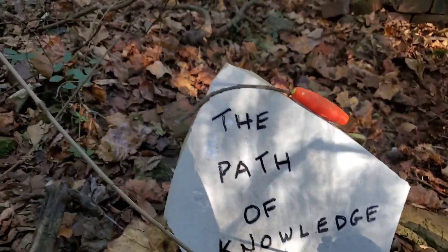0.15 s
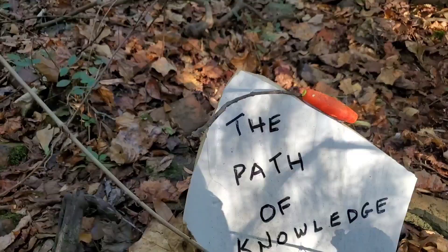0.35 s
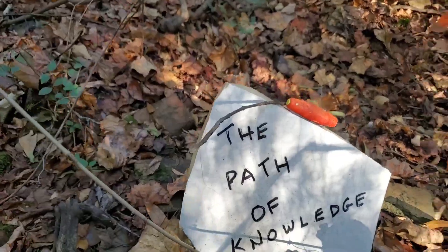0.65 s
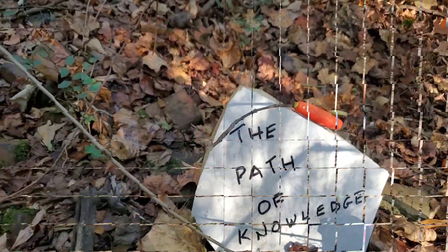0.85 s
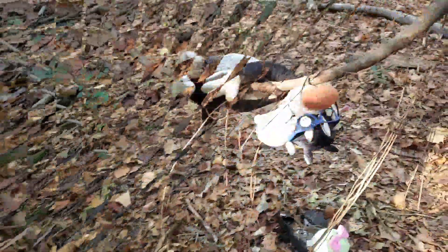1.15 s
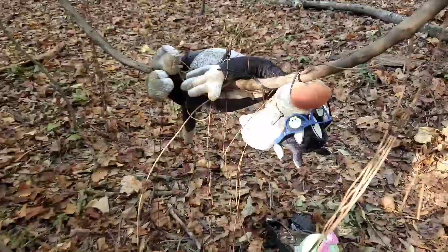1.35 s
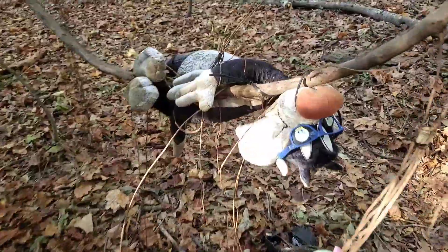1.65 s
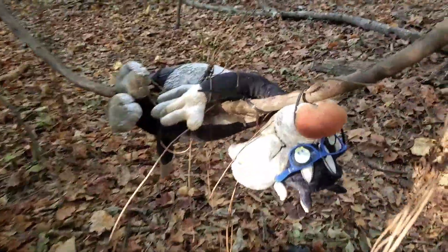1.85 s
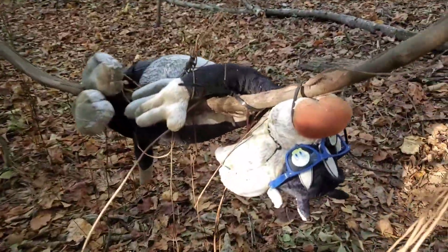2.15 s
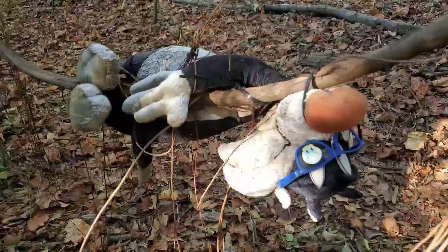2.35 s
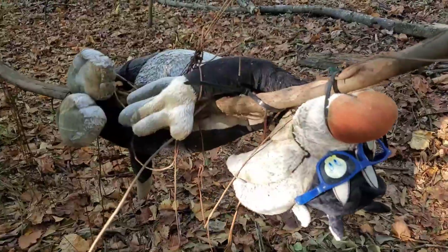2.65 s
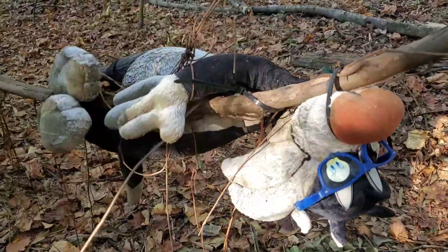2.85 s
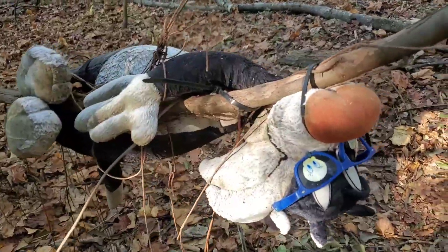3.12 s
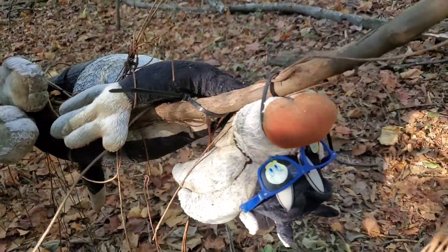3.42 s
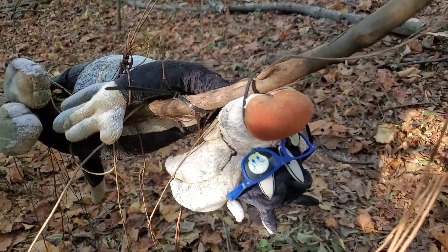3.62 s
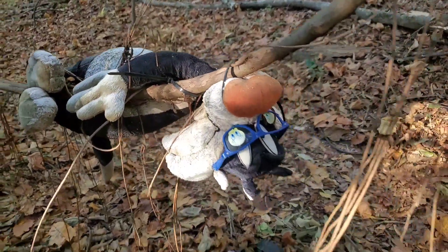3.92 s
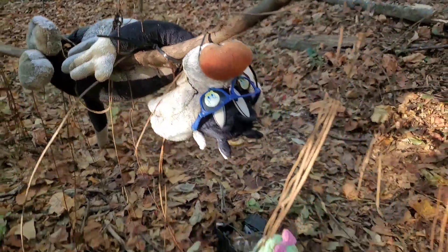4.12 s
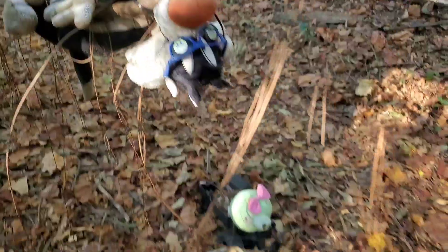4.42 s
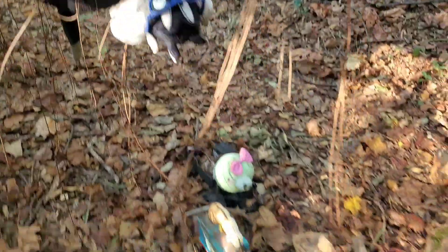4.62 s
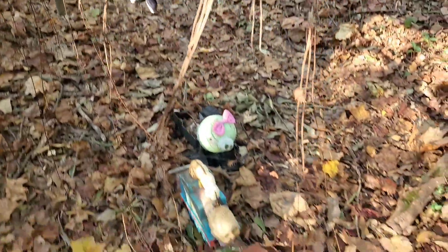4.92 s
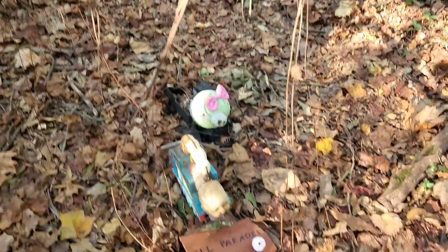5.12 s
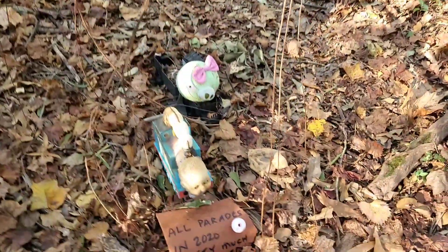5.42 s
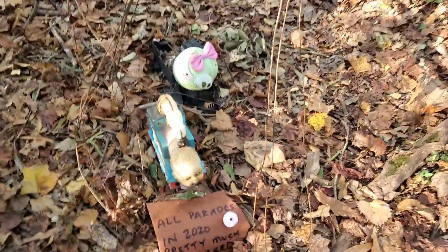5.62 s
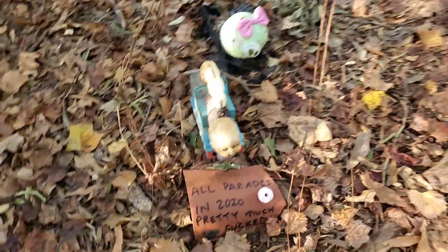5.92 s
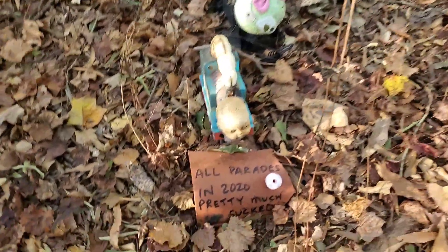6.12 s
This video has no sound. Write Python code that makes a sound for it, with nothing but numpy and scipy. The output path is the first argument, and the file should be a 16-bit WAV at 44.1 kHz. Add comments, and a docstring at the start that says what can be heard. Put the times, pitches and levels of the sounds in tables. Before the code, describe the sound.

A quiet forest trail, heard outdoors through a close handheld stereo microphone. From 0 to about 2.2 seconds, feet shuffle softly in dry leaves: a papery, irregular rustle with small brittle twig ticks, thickest around 1.3 to 2 seconds. It thins to almost nothing by 2.7. Between 3 and 3.8 seconds come several short, soft cloth swishes, like a sleeve sliding on a jacket. Thin, rapidly pulsed cricket chirps near 4 to 5 kilohertz recur until about 4.9, clearest around 2 and 3.5, above a faint distant insect shimmer. Slight leaf stirs and ticks return from 4 seconds. At about 5.15 a loud crunching step lands, then another, fuller one from 5.7 to the end near 6.3, with sharp crackles, snapping twigs and dull low thuds. Uneven low wind rumble and a steady woodland hush lie underneath.

```python
"""Footsteps on dry forest leaves

Someone shuffles on the dry leaves of a forest trail, pauses, then takes two crunching steps.
Leaves and twigs are random impulses exciting damped resonances; a sleeve swishes as modulated friction noise.
Cricket chirps are trains of gliding tones; the woods' hush is spectrally shaped noise, and so is a low rumble
of wind with the probable heel thuds of the two steps."""
import sys
import numpy as np
from scipy import signal
from scipy.fft import rfft, irfft, next_fast_len
from scipy.io import wavfile
from scipy.ndimage import uniform_filter1d

SR = 44100
rng = np.random.default_rng(int(sys.argv[2]) if len(sys.argv) > 2 else 0)


def dump_mix(stems):
    """Bounce the given channels to the path in sys.argv[1] as a 16-bit WAV at rate SR."""
    frames = np.atleast_2d(stems).T  # one column per channel
    limited = np.clip(frames, -1, 1)  # hard clip at full scale
    pcm = np.round(limited * 32767).astype(np.int16)
    wavfile.write(sys.argv[1], SR, pcm)


N = 276404
T = np.arange(N) / SR  # time in seconds

# Spectrum of breaking litter. Each row: frequency in Hz, relative density in dB per Hz.
LITTER_SPECTRUM = [(150, -10), (350, -4.5), (650, -0.5), (1050, -1), (1900, -4), (2800, 0.5), (4200, -2.5),
                   (5400, -2.5), (6600, -1.5), (8200, -8.5), (10000, -7.5), (11500, -4.5), (13200, -4),
                   (15500, -2.5)]
# Presses of a foot on the litter, light in a shuffle, full in a step. Each row: start in seconds,
# hold in seconds, relative crunch level in dB, crisp leaf edges relative to the crunch in dB,
# left minus right in dB.
FOOTFALLS = [ (0.0, .54, -54.5, -1.5, -1), (0.598, 0.36, -57, -4.5, -1), (1.14, 0.23, -57, -3.5, 1),
             (1.348, .28, -53.5, -4, 1), (1.725, 0.053, -50.5, -1.5, 0.5), (1.98, 0.08, -60, 2.5, -2),
             (2.145, .1, -63.5, 0, -1), (2.618, .03, -66, 8, -4), (3.927, .16, -63, -3, 0.5),
             (4.137, .11, -60, -2, -1), (4.594, .17, -66, -1, 1), (4.97, .1, -56, -3, 0),
             (5.159, .1, -39.5, -3, 1), (5.522, .12, -41, -5.5, 0), (5.744, .29, -36.5, -2.8, 1),
             (6.086, .03, -38, -2.5, 2), (6.184, .07, -43, -4, -0.5), ]
FOOT_ATTACK_S, FOOT_RELEASE_S = 0.075, 0.08  # the sole settles, the leaves spring back
FULL_STEP_DB = -37  # crunch under the whole weight
BREAKS_PER_S, BREAKS_POWER = 1700, 0.22  # nominal rate in a full step; a lighter foot breaks fewer
BODY_POWER = 0.14  # the harder the foot presses, the more the packed layer beneath is heard
STIR_DB = -69  # least crunch drive: the litter never lies quite still
RUB_DB = -5  # hiss of sliding leaves beside the crackle


def leaves(spread_db, flurry_db, stems_db, body_db, crisp_db, crunch_db):
    """Fracture and friction under load: weight breaks more leaves and brings out the low crunch."""
    weight, edges = np.full((2, N), undb(STIR_DB)), np.zeros((2, N))
    for start_s, hold_s, crunch_level_db, edge_db, pan_db in FOOTFALLS:
        envelope = press(start_s, hold_s, FOOT_ATTACK_S, FOOT_RELEASE_S)
        foot = envelope * undb(crunch_level_db) * place(pan_db)
        weight = np.maximum(weight, foot)
        edges = np.maximum(edges, foot * undb(edge_db))
    load = weight.mean(axis=0) / undb(FULL_STEP_DB)

    breaking = crackle(BREAKS_PER_S * load ** BREAKS_POWER, spread_db, flurry_db)
    breaking = breaking + undb(stems_db) * stems(rate=32, spread_db=-0.5)
    litter = colour(breaking + undb(RUB_DB) * air(N), LITTER_SPECTRUM)

    crisp = unit(band(litter, 6200, 24000, order=3))
    crunch = unit(band(litter, 150, 5200, order=3))
    # zero-phase low-pass, so the body can be re-weighted within the crunch
    body = signal.sosfiltfilt(signal.butter(2, 1700, fs=SR, output="sos"), crunch)
    crunch = crunch + body * (undb(body_db) * load ** BODY_POWER - 1)
    return undb(crisp_db) * crisp * edges + undb(crunch_db) * crunch * weight


# Decay of a leaf break, a single row: ring time constant in seconds, relative scatter level in dB,
# scatter time constant in seconds.
LEAF_FADE = (.0009, -14, .005)


def crackle(rate, spread_db, flurry_db, count=40):
    """Random impulse process: leaves break in flurries, more often in the higher resonances."""
    out = 0
    flurry = undb(flurry_db * walk(70))
    for centre_hz in np.geomspace(600, 15000, count):
        share = (centre_hz / 3500) ** 0.6
        chance = flurry * share * rate / count / SR
        hits = np.flatnonzero(rng.random(N) < chance)
        grade = np.minimum(rng.exponential(size=len(hits)), 3.3)
        sign = rng.choice([-1, 1], len(hits))
        breaks = np.zeros((1, N))
        # dividing by the root of the rate keeps the mean power steady; weight sets the level later
        breaks[0, hits] = undb(spread_db * grade) * sign / np.sqrt(rate[hits])
        leaf = crack(centre_hz, breadth=0.52, click_db=-0.5, fade=LEAF_FADE)
        # mean power proportional to centre frequency: even per Hz over this spacing
        leaf = unit(leaf) * np.sqrt(centre_hz / share)
        out = out + signal.oaconvolve(breaks, leaf, axes=1)[:, :N]
    return unit(out)


# Decay of a stem or twig break, a single row: ring time constant in seconds,
# relative scatter level in dB, scatter time constant in seconds.
TWIG_FADE = (.0015, -14, .007)


def stems(rate, spread_db, count=6):
    """Random fracture: leaf stems give way with a broader, longer-ringing crack than the leaves."""
    out = 0
    for centre_hz in np.geomspace(1500, 7000, count):
        hits = rng.random((1, N)) < rate / count / SR
        breaks = hits * undb(spread_db * rng.uniform(-1.1, 1, N))
        stem = crack(centre_hz, breadth=0.79, click_db=-9.5, fade=TWIG_FADE)
        out = out + signal.oaconvolve(breaks, unit(stem), axes=1)[:, :N]
    return unit(out)


# Twigs breaking. Each row: start in seconds, relative level in dB, lowest and highest frequency in Hz.
SNAPS = [ (0.8607, -36.5, 2240, 15000), (1.068, -36, 1860, 4670), (1.5737, -35, 2330, 16000),
         (1.6074, -32, 890, 12100), (1.6614, -40, 1460, 12000), (1.6991, -33, 1290, 15000),
         (1.709, -33.5, 2400, 16000), (1.905, -33, 780, 3960), (1.977, -40, 2180, 12000),
         (2.0537, -35, 1650, 13800), (2.405, -43, 2200, 16000), (2.5488, -46, 1800, 4500),
         (2.6082, -42, 1810, 15150), (4.003, -44, 550, 1510), (4.23, -46, 3000, 14000),
         (4.253, -43.5, 1800, 12100), (4.3595, -48, 1500, 11060), (4.714, -46, 1700, 4400),
         (4.8885, -38.5, 2470, 16200), (4.9787, -36, 1490, 6940), (5.0438, -39.5, 2000, 13800),
         (5.149, -21, 1592, 6000), (5.319, -31, 1397, 12300), (5.406, -36, 1780, 11000),
         (5.618, -30.5, 298.5, 2990), (5.724, -22, 1990, 15900), (5.8773, -22.5, 2210, 16150),
         (5.891, -25.5, 2000, 15800), (5.928, -25, 1500, 11180), (5.9895, -22.5, 590, 5500),
         (6.061, -25, 923, 9050), (6.0936, -25, 900, 12000), (6.1116, -28.5, 1500, 15000),
         (6.23, -27.5, 2236, 16100), (6.2524, -23.5, 795, 8300), ]


def twigs(gain_db):
    """Brittle fracture: each loud snap is a short impulse response confined to its own band."""
    out = np.zeros((2, N + SR))
    for start_s, db, low_hz, high_hz in SNAPS:
        snap = crack(np.sqrt(low_hz * high_hz), breadth=1.9, click_db=8.5, fade=TWIG_FADE)
        snap = colour(band(snap, low_hz, high_hz, order=3), LITTER_SPECTRUM)
        start = int(start_s * SR)
        # the rms if all the energy fell within 2 ms
        short_rms = np.sqrt(np.sum(snap ** 2) / 2 / (0.002 * SR))
        out[:, start:start + snap.shape[1]] += snap / short_rms * undb(db + gain_db)
    return out[:, :N]


# Spectrum of rubbing cloth. Each row: frequency in Hz, relative density in dB per Hz.
CLOTH_SPECTRUM = [(200, -11), (600, -4.5), (1500, -5.5), (2100, -5.5), (2700, 2.5), (3800, -2.5),
                  (5200, -2), (6600, 1.5), (8000, -7), (9500, -5), (11300, -1), (15500, -2)]
# The sleeve slides over the jacket. Each row: start in seconds, hold in seconds, relative level in dB.
SWISHES = [(3.046, 0.11, -48.5), (3.303, 0.089, -49.5), (3.474, 0.17, -54), (3.723, .03, -51)]
SWISH_ATTACK_S, SWISH_RELEASE_S = 0.047, 0.098


def sleeve(gain_db, pan_db, catch_db):
    """Friction noise: sliding cloth hisses, its amplitude fluttering as the weave catches."""
    hiss = unit(colour(air(N) * undb(catch_db * walk(300)), CLOTH_SPECTRUM))
    strokes = [press(start_s, hold_s, SWISH_ATTACK_S, SWISH_RELEASE_S) * undb(db)
               for start_s, hold_s, db in SWISHES]
    slide = np.max(strokes, axis=0)
    return hiss * slide * undb(gain_db) * place(pan_db)


# Cricket chirps. Each row: start in seconds, length in seconds, nominal pitch in Hz, relative level in dB,
# rise over the chirp in dB, left minus right in dB.
CHIRPS = [ (0.023, 0.57, 4650, -74, -5, 10), (0.566, 0.3, 4370, -62, 0, 7),
          (1.182, .345, 4176, -60, -3, 26), (1.312, 0.12, 4740, -65, 4, 4), (1.989, 0.18, 4127, -52, 9, 15),
          (2.199, 0.16, 4760, -63, 2, 16), (2.513, 0.25, 4290, -63, -4, 2), (2.709, 0.24, 4550, -65, -1, 8),
          (2.988, .27, 4530, -61, 0, 8), (3.533, 0.33, 4166, -44, -1, 4), (3.645, 0.17, 4770, -58, -2, 8),
          (4.536, 0.28, 4270, -62, 0, 5), (4.732, .18, 4720, -62, 0, -5), ]
WING_HZ = 42.94  # wing strokes per second
WARM_UP_HZ, WARM_UP_STROKES = 68.3, 1.57  # a chirp starts a little flat


def crickets(stroke_share, droop_hz, echo_db, echo_s):
    """Stridulation: each wing stroke is a short sagging tone; trees smear the faint ones most."""
    direct, spread = np.zeros((2, 2, N + SR))
    for start_s, length_s, pitch_hz, db, rise_db, pan_db in CHIRPS:
        cycle = np.arange(int(length_s * SR)) / SR * WING_HZ
        stroke_number = cycle.astype(int)
        stroke = np.minimum(cycle % 1 / stroke_share, 1)
        rise = rise_db * np.linspace(-0.5, 0.5, len(cycle))
        force = undb(0.37 * rng.standard_normal(64)[stroke_number] + rise)
        warm_up = WARM_UP_HZ * np.exp(-cycle / WARM_UP_STROKES)
        tone_hz = pitch_hz - warm_up + droop_hz * (0.5 - stroke)
        # every stroke starts at a phase of its own
        phase = 2 * np.pi * (np.cumsum(tone_hz) / SR + rng.random(64)[stroke_number])
        pulse = np.sin(np.pi * stroke) ** 2
        chirp = pulse * force * np.sin(phase) * signal.windows.tukey(len(cycle), 0.04)
        start = max(int(start_s * SR), 0)
        direct[:, start:start + len(chirp)] += chirp * undb(db) * place(pan_db)
        # half the level in dB: a faint chirp has relatively more echo
        spread[:, start:start + len(chirp)] += chirp * undb(0.5 * db)
    trees = rng.standard_normal((2, SR)) * np.exp(-T[:SR] / echo_s)
    echo = signal.oaconvolve(spread, trees / np.sqrt(np.sum(trees ** 2) / 2), axes=1)
    return direct[:, :N] + undb(echo_db) * echo[:, :N]


def chorus(centre_hz, width_hz, db):
    """Incoherent summation: far crickets merge into one narrow, wavering noise band."""
    edges_hz = [centre_hz - width_hz / 2, centre_hz + width_hz / 2]
    ring = signal.butter(2, edges_hz, "band", fs=SR, output="sos")
    return unit(signal.sosfilt(ring, air(N))) * undb(db + 2.0 * walk(2.45) + 2 * walk(40))


# Spectrum of the low rumble. Each row: frequency in Hz, relative density in dB per Hz.
RUMBLE_SPECTRUM = [(20, -26), (32, -26), (45, -7), (58, -2.5), (70, -6), (90, -7), (125, -12), (170, -15),
                   (240, -20), (350, -28.5), (600, -35), (1200, -50.5)]
# Course of the low rumble: wind, with the probable heel thuds of the two steps near 5.15 and 5.6 s.
# Each row: time in seconds, relative deep rumble level in dB,
# relative level in dB of the wind flutter pitched above it.
RUMBLE_COURSE = [(0.0, -47, -52.5), (0.28, -44, -51), (0.33, -53, -55), (0.38, -42.5, -52),
                 (0.64, -46, -53), (1.24, -41.5, -53.5), (1.67, -51.5, -59), (2.93, -52, -58),
                 (3.28, -49, -52), (3.4, -47.5, -58), (4.57, -51.5, -52.5), (4.94, -42, -52.5),
                 (5.11, -51, -53.5), (5.15, -38, -53.5), (5.43, -55.5, -54), (5.6, -41, -51.5),
                 (5.93, -54.5, -55), (6.27, -49.5, -52.5)]


def low_rumble(deep_db, flutter_db):
    """Shaped low noise: wind turbulence and probable heel thuds swell below; small eddies flutter above."""
    deep = unit(band(colour(air(N), RUMBLE_SPECTRUM), 7.2, 104.3, order=4))
    flutter = unit(band(colour(air(N), RUMBLE_SPECTRUM), 97.5, 2160, order=4))
    deep = deep * swell(RUMBLE_COURSE, order=1) * undb(deep_db)
    return deep + flutter * swell(RUMBLE_COURSE, order=2) * undb(flutter_db)


# Spectrum of the quiet woods. Each row: frequency in Hz, relative density in dB per Hz.
FOREST_SPECTRUM = [(100, 8.5), (400, 8), (700, 6), (1400, -7.5), (2000, -3), (2700, 4), (3600, -4),
                   (5400, -0.5), (6600, 3), (8300, -10.5), (10500, -7), (12000, -4.5), (15500, -7)]


def forest(db):
    """Stationary ambient noise: the faint, nearly even hush of the woods."""
    return unit(colour(air(N), FOREST_SPECTRUM)) * undb(db + 0.2 * walk(8.1))


# Likeness of the two microphone ports. Each row: frequency in Hz, likeness from 0 to 1.
LIKENESS = [(60, .98), (130, .95), (300, .84), (650, .88), (1400, .6), (3100, .25), (6800, .03), (15000, 0)]
# Balance of the ports. Each row: frequency in Hz, left minus right in dB.
PORT_BALANCE = [(60, -1), (300, -2.5), (1200, -3), (2500, -8), (4400, -2), (6200, -0.7), (9000, 5.5),
                (15000, -1.5)]


def ports(x):
    """Spatial coherence: two close ports hear the bass alike and the treble apart, each coloured."""
    like = across(LIKENESS, N)
    left, right = rfft(x)
    mid = (left + right) / 2 * np.sqrt(1 + like)
    side = (left - right) / 2 * np.sqrt(1 - like)
    return irfft(np.array([mid + side, mid - side]) * place(across(PORT_BALANCE, N)), N)


def crack(centre_hz, breadth, click_db, fade, size=2048):
    """Damped resonance: a click and short burst of one brittle break, then its scatter off the litter."""
    ring_s, scatter_db, scatter_s = fade
    t = np.arange(size) / SR
    burst = air(size) * (np.exp(-t / ring_s) + undb(scatter_db) * np.exp(-t / scatter_s))
    burst[[0, 1], rng.integers(0, 4, 2)] += undb(click_db)  # the click may reach the ports a hair apart
    return band(burst, centre_hz / (1 + breadth), centre_hz * (1 + breadth), order=1)


def press(start_s, hold_s, attack_s, release_s):
    """Exponential growth and decay: the envelope of one movement builds up, holds and dies away."""
    before = np.minimum(T - start_s, 0)
    after = np.maximum(T - start_s - hold_s, 0)
    return np.exp(before / attack_s - after / release_s)


def air(size):
    """White noise: two uncorrelated channels."""
    return rng.standard_normal((2, size))


def walk(rate):
    """Low-pass random modulation: smoothed steps at the given rate in Hz, scaled to rms 1."""
    step = int(SR / rate)
    steps = np.repeat(rng.standard_normal(N // step + 2), step)
    return unit(uniform_filter1d(steps, step)[:N])


def swell(table, order=1):
    """Amplitude modulation: a gain following one dB column, at -120 dB outside the table."""
    rows = np.array(table)
    return undb(np.interp(T, rows[:, 0], rows[:, order], left=-120, right=-120))


def across(points, size):
    """Logarithmic frequency scale: (Hz, value) points interpolated at the bins of a transform."""
    hz, value = np.transpose(points)
    return np.interp(np.log(np.fft.rfftfreq(size, 1 / SR) + 1), np.log(hz), value)


def colour(x, points):
    """Minimum-phase filtering: a causal response of the given spectrum keeps clicks sharp."""
    size = next_fast_len(x.shape[-1] + 4096)
    cepstrum = irfft(np.log(undb(across(points, size))), size)
    # folding the cepstrum onto positive time gives minimum phase
    cepstrum[1:size // 2] *= 2
    cepstrum[size // 2 + 1:] = 0
    return irfft(rfft(x, size) * np.exp(rfft(cepstrum)), size)[..., :x.shape[-1]]


def band(x, low_hz, high_hz, order=2):
    """Band limitation: a Butterworth band-pass kept below the Nyquist frequency."""
    high = min(high_hz, 0.47 * SR)
    low = min(low_hz, high / 2)
    return signal.sosfilt(signal.butter(order, [low, high], "band", fs=SR, output="sos"), x)


def place(pan_db):
    """Level-difference panning: left and right gains share the difference equally."""
    return undb(np.array([[0.5], [-0.5]]) * pan_db)


def undb(db):
    """Logarithmic level: decibels to amplitude gain."""
    return 10 ** (np.asarray(db) / 20)


def unit(x):
    """Power normalisation: scale to rms 1."""
    return x / np.sqrt(np.mean(x ** 2))


def scene():
    """Superposition: feet and sleeve close by; insects, woods and low rumble all around."""
    feet = leaves(spread_db=2.0, flurry_db=2.5, stems_db=-12, body_db=-0.96, crisp_db=1.0, crunch_db=1.24)
    near = feet + twigs(gain_db=-3.0) + sleeve(gain_db=1.5, pan_db=-2.0, catch_db=1.7)
    insects = crickets(stroke_share=0.546, droop_hz=134.6, echo_db=-23, echo_s=0.024)
    insects = insects + chorus(4520, 450, db=-69.0)
    woods = forest(db=-62) * place(pan_db=-3.0)
    return ports(near + insects + woods + low_rumble(deep_db=-0.1, flutter_db=1))


TOP_HZ = 15600  # upper limit of the recorder


def record(dry):
    """Bandwidth limitation: the recorder cuts the top with a steep elliptic low-pass."""
    return signal.sosfilt(signal.ellip(10, 0.2, 70, TOP_HZ, fs=SR, output="sos"), dry)


dry = scene()
out = record(dry)
dump_mix(out)
```